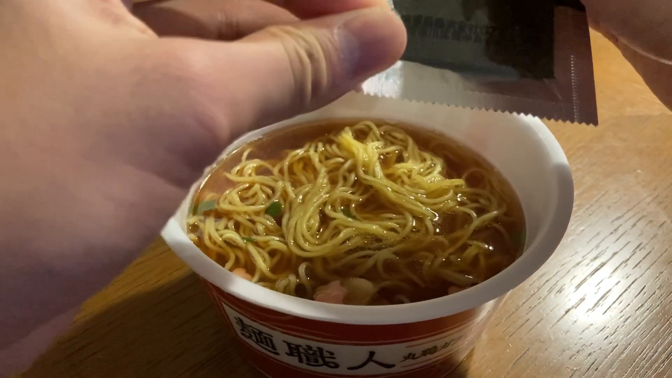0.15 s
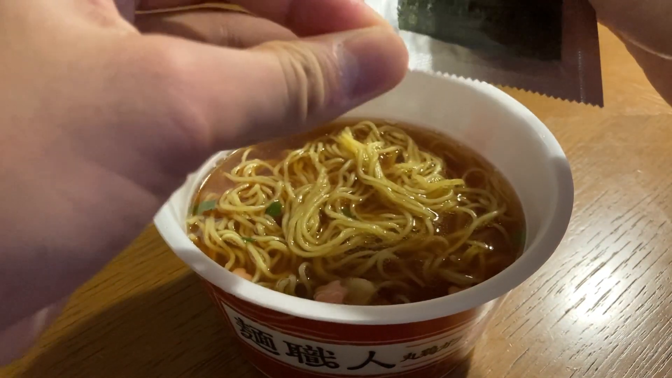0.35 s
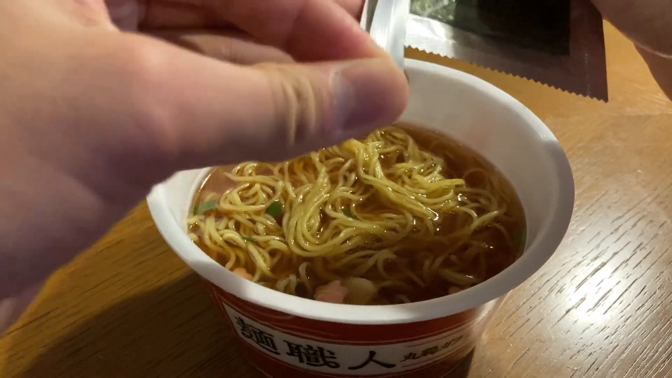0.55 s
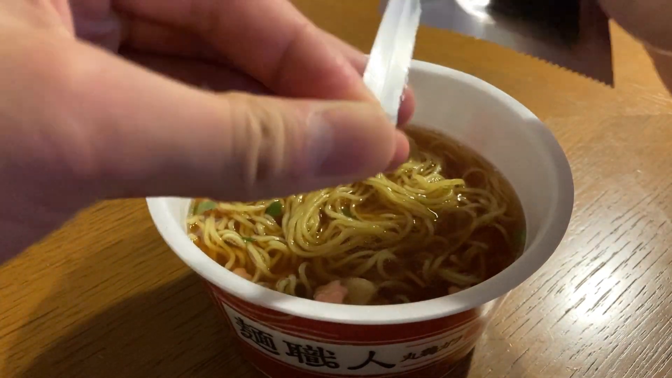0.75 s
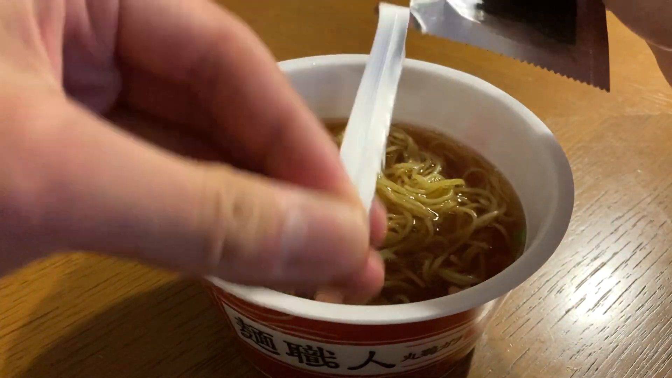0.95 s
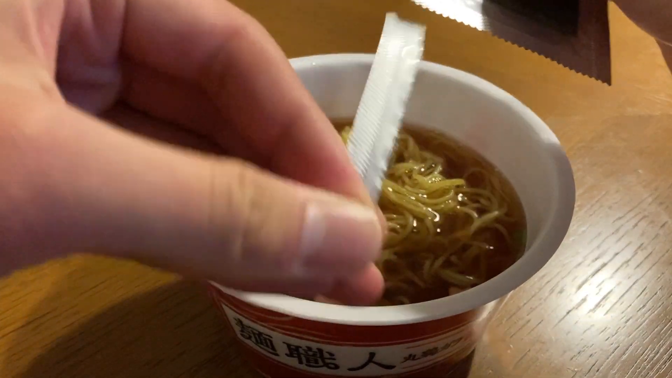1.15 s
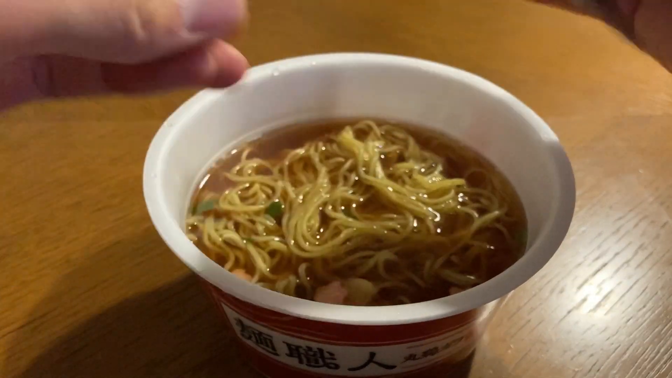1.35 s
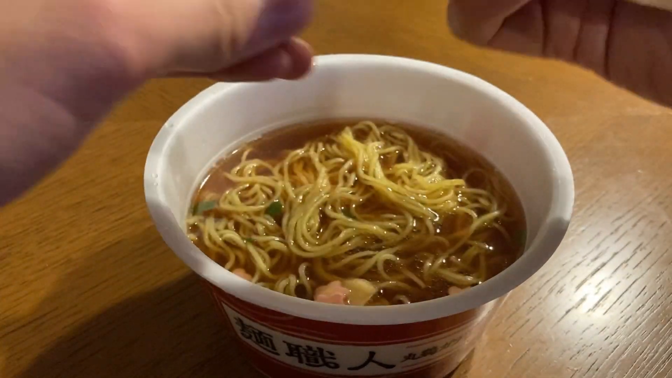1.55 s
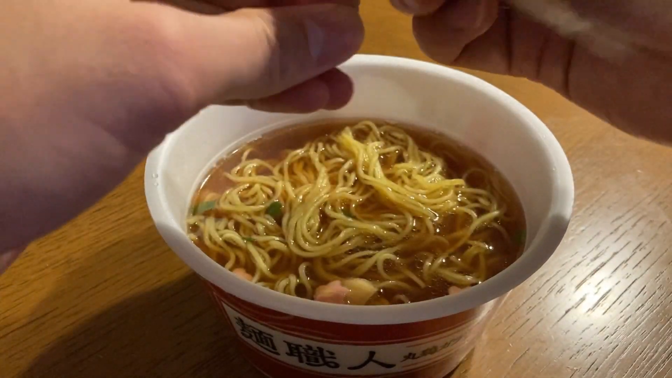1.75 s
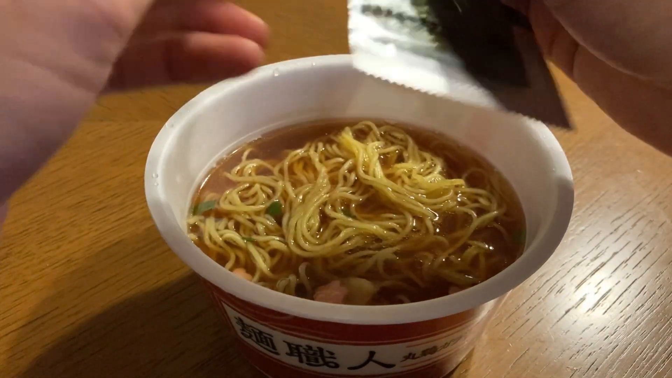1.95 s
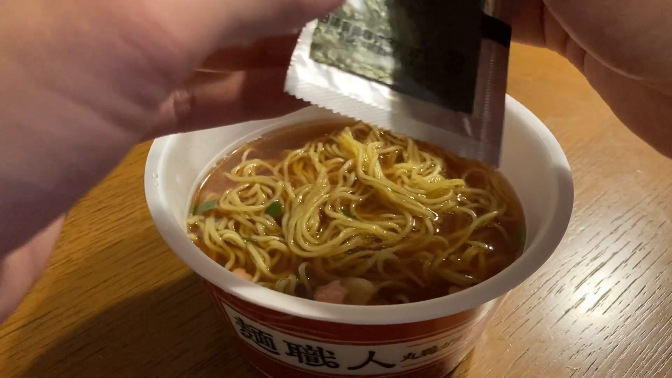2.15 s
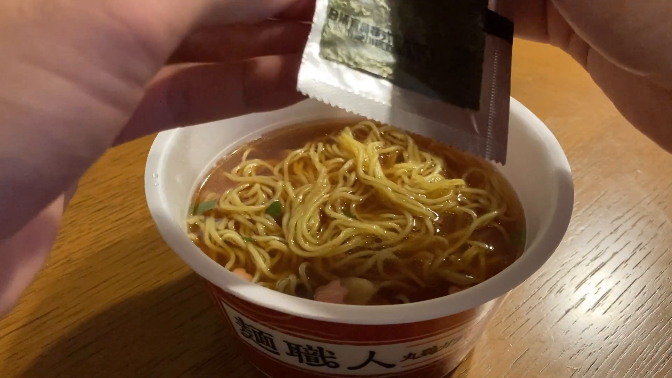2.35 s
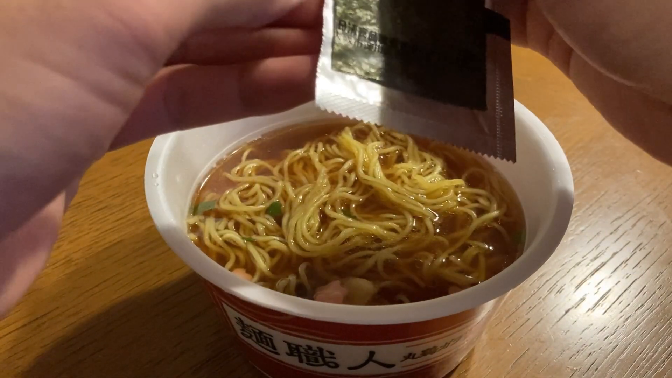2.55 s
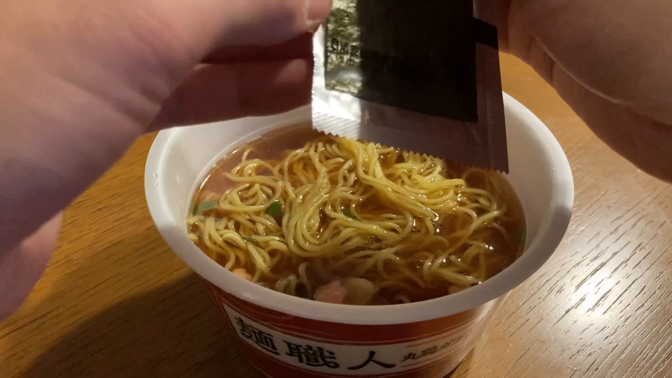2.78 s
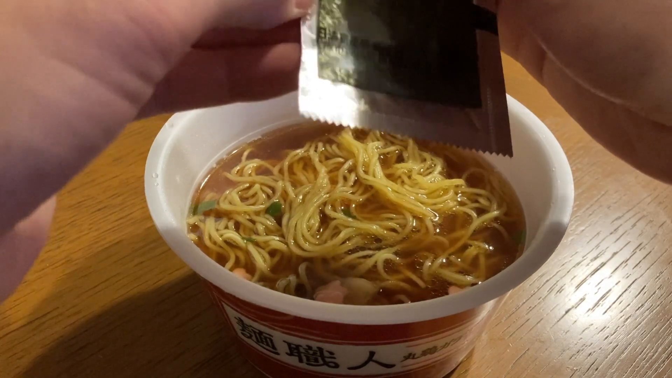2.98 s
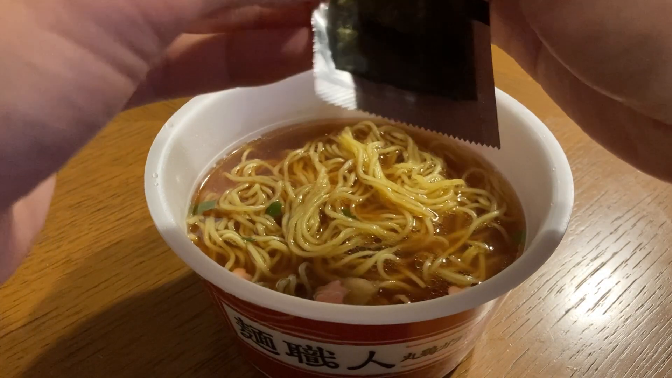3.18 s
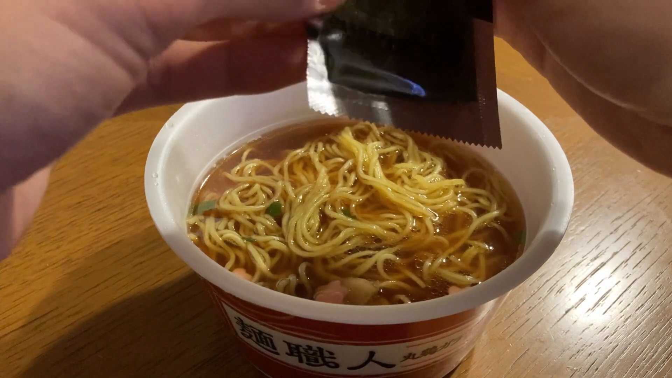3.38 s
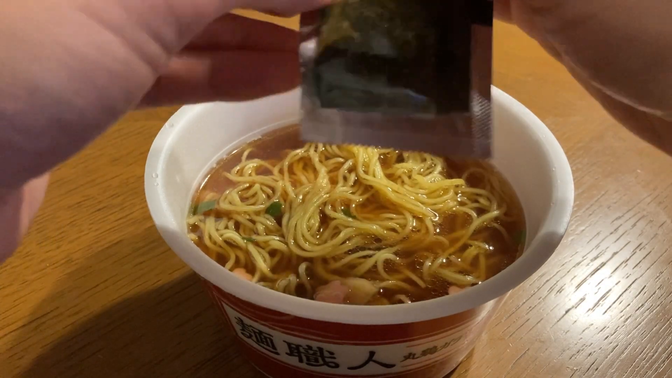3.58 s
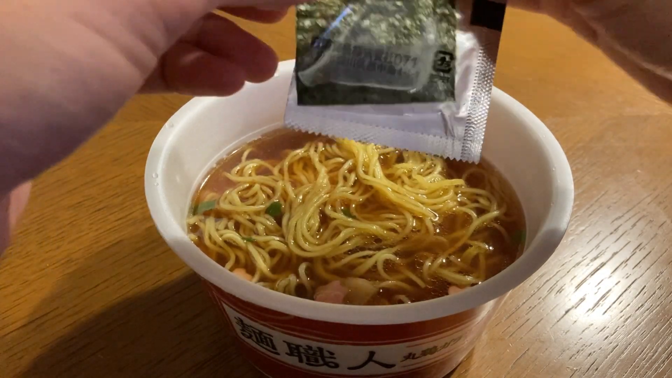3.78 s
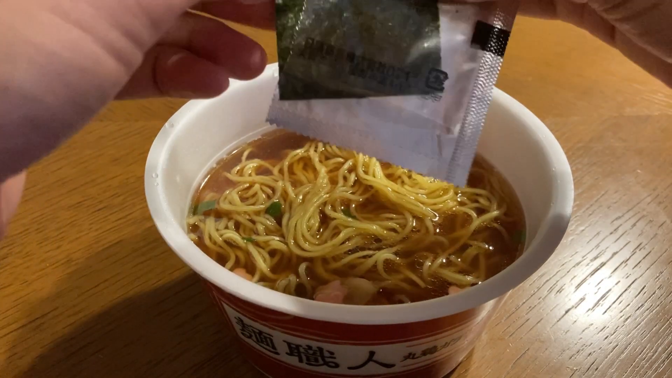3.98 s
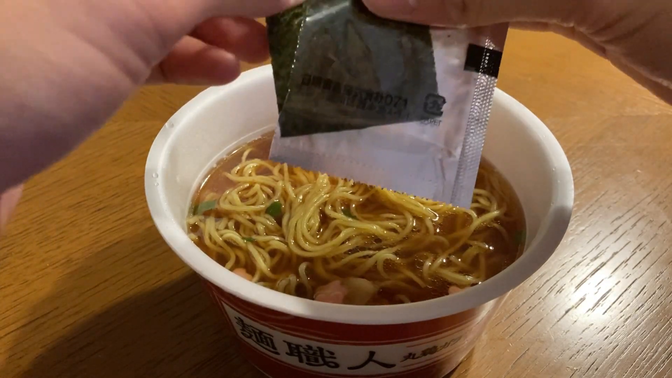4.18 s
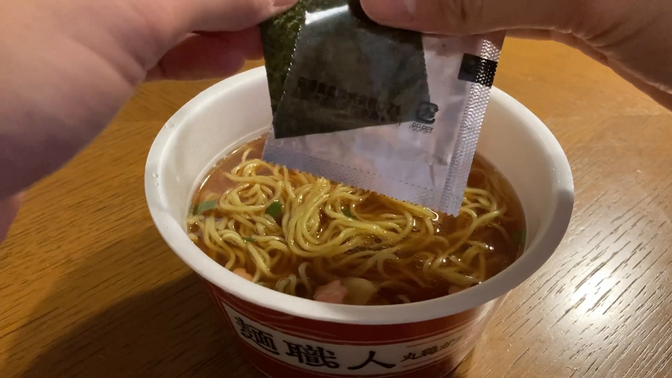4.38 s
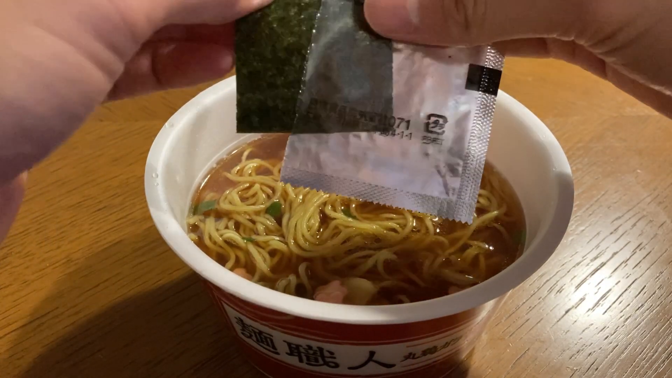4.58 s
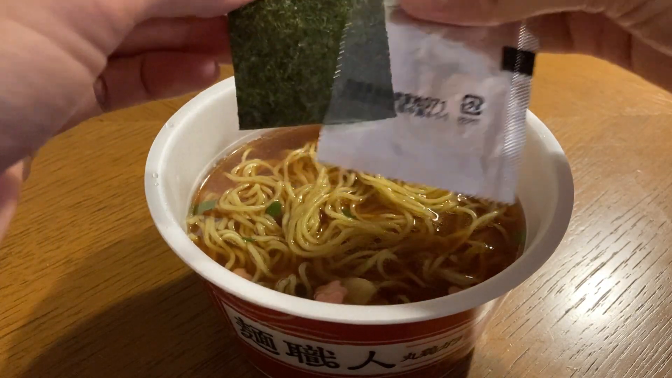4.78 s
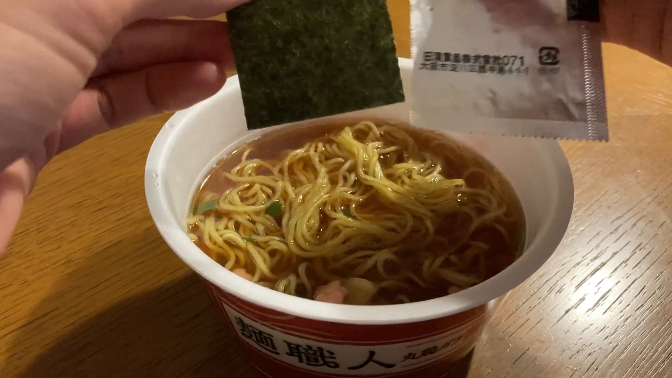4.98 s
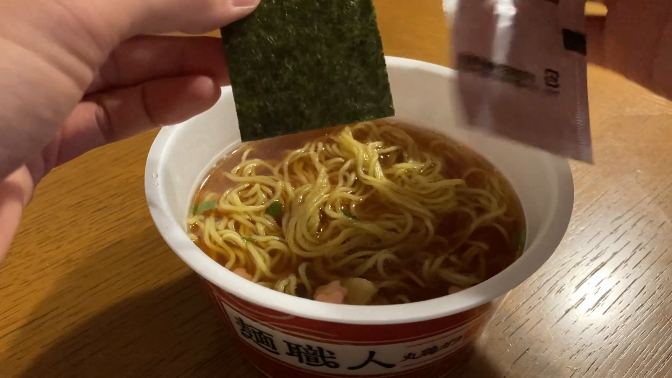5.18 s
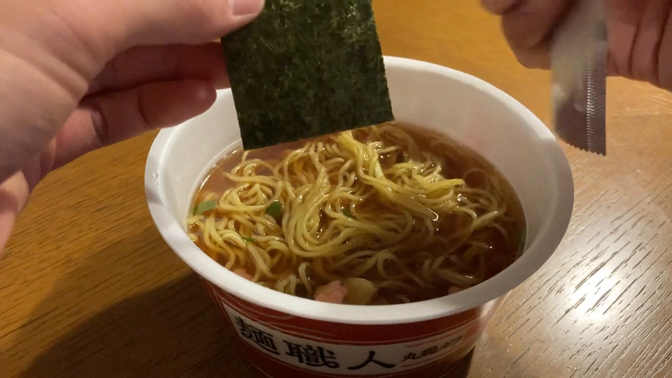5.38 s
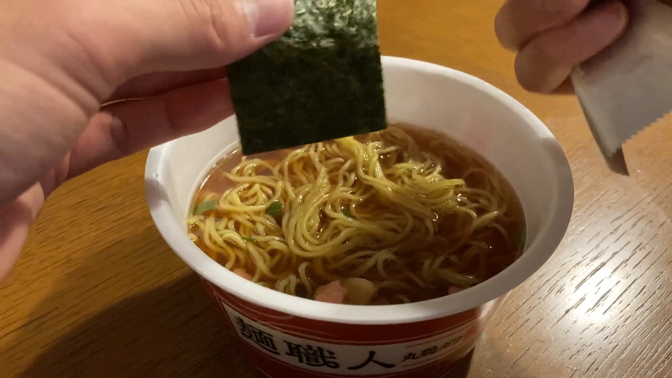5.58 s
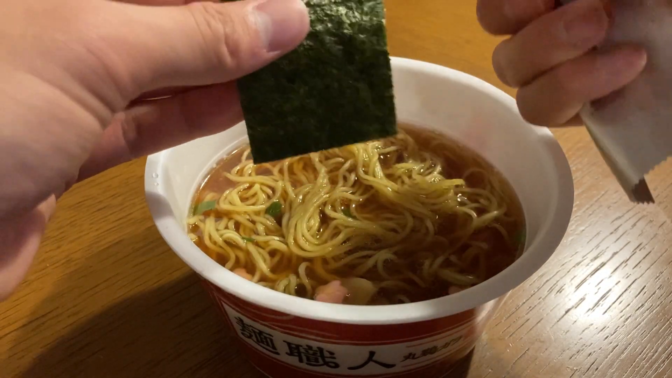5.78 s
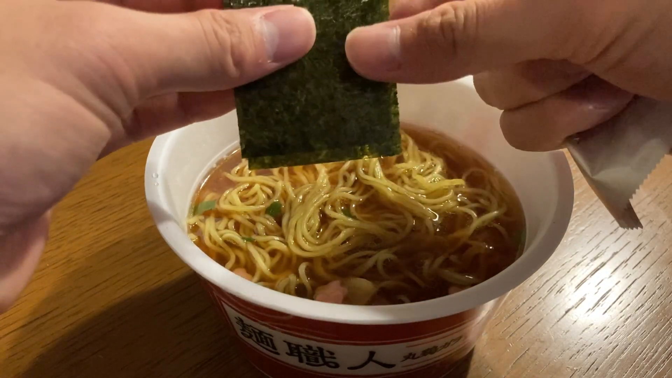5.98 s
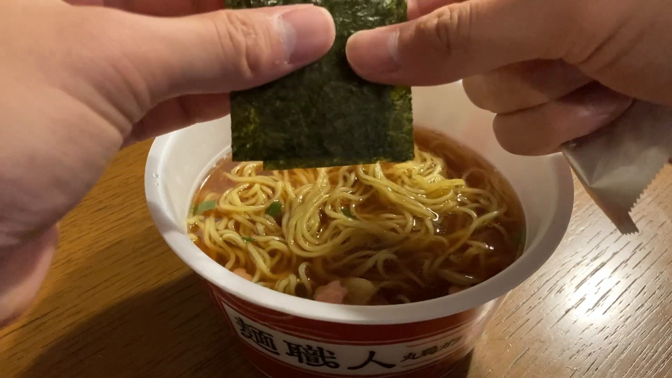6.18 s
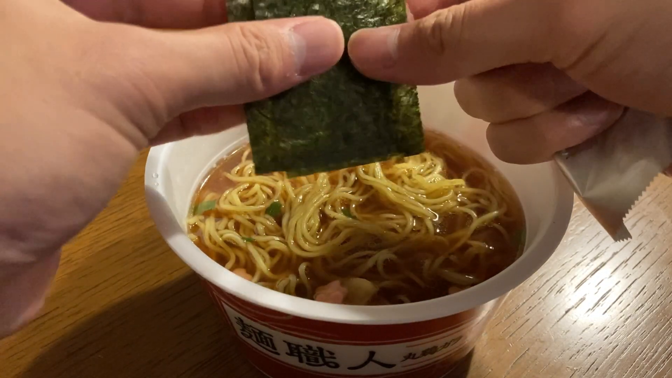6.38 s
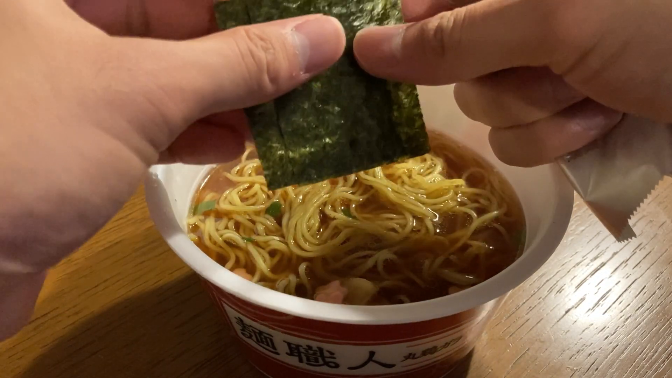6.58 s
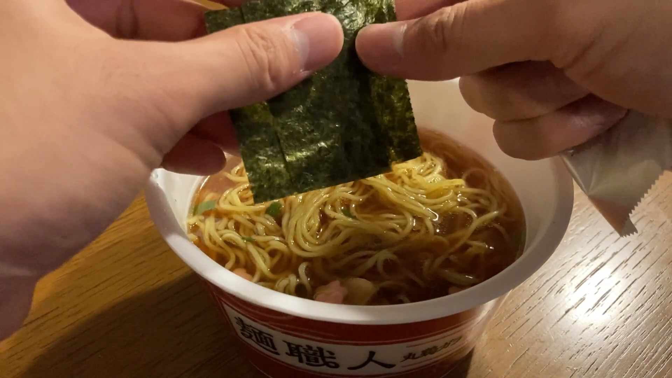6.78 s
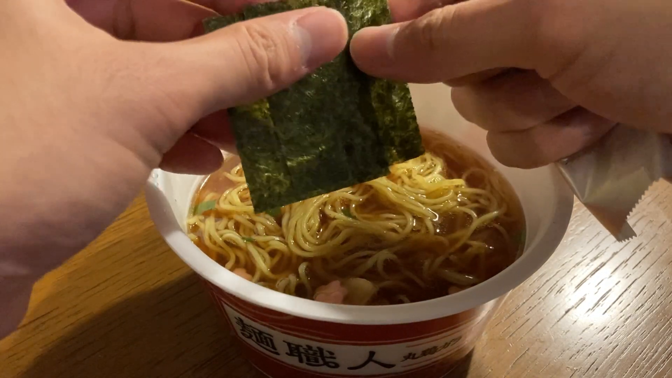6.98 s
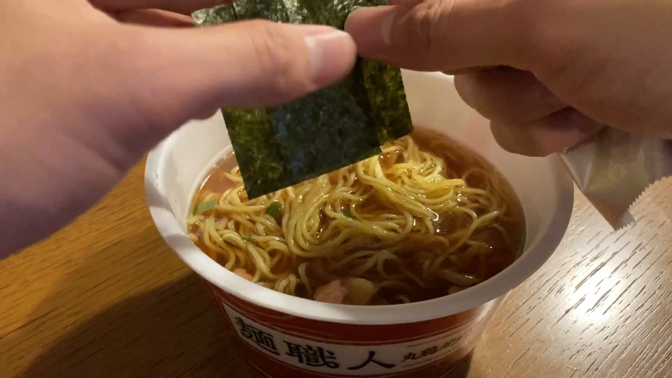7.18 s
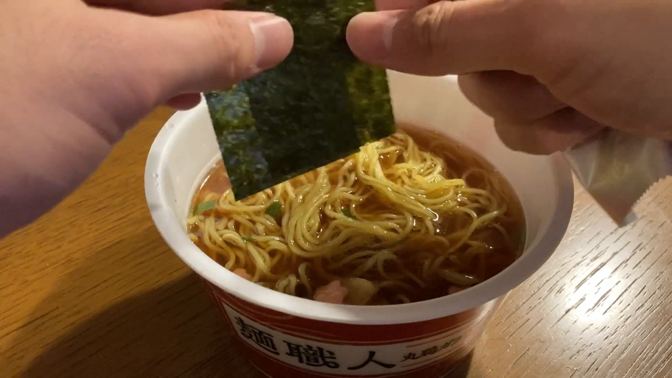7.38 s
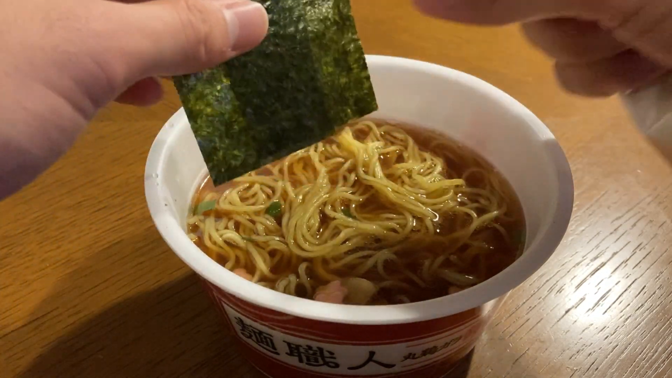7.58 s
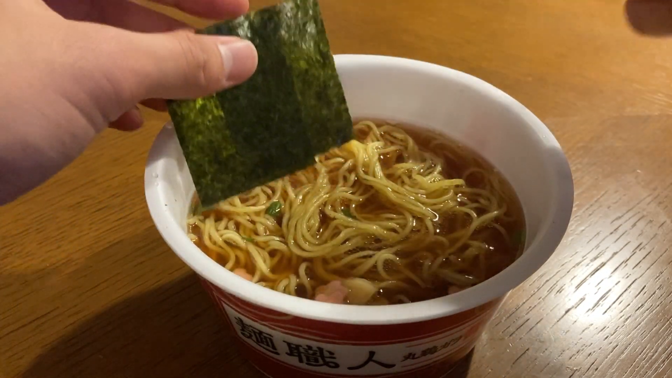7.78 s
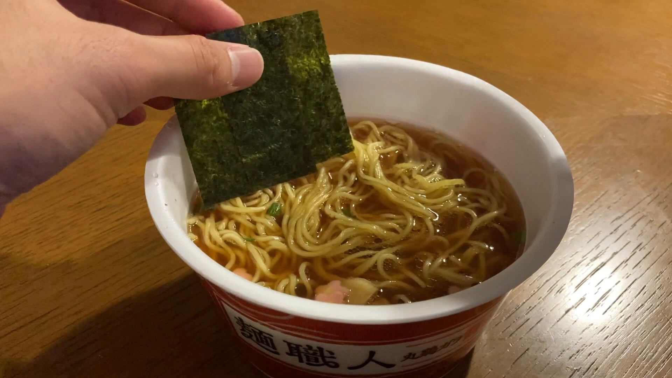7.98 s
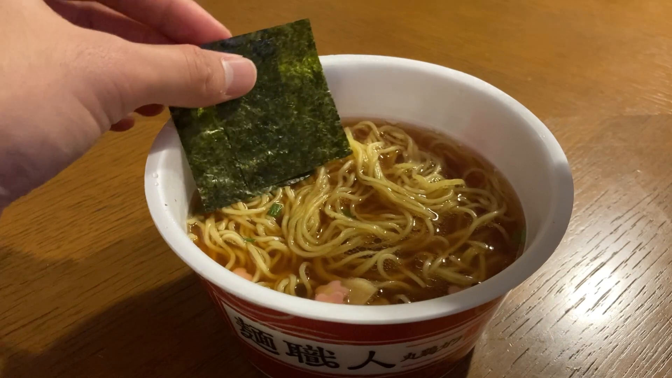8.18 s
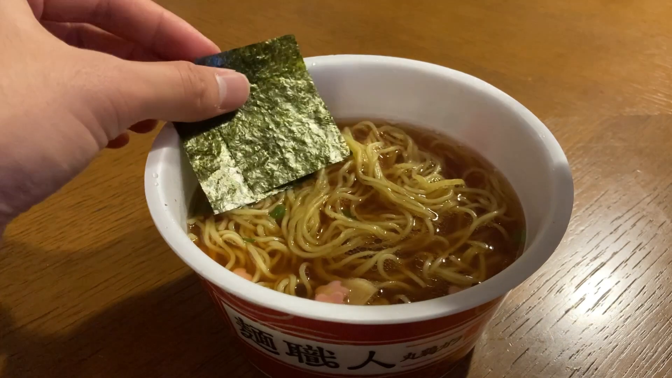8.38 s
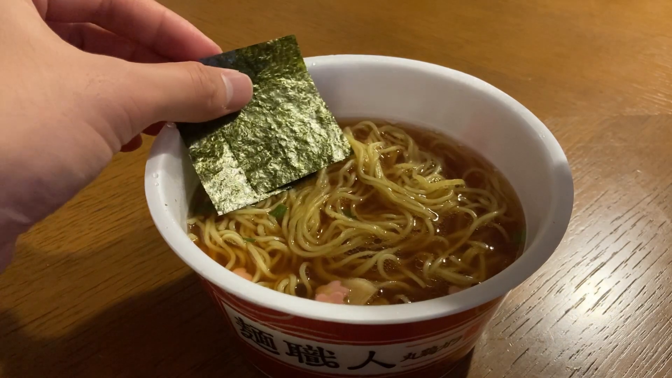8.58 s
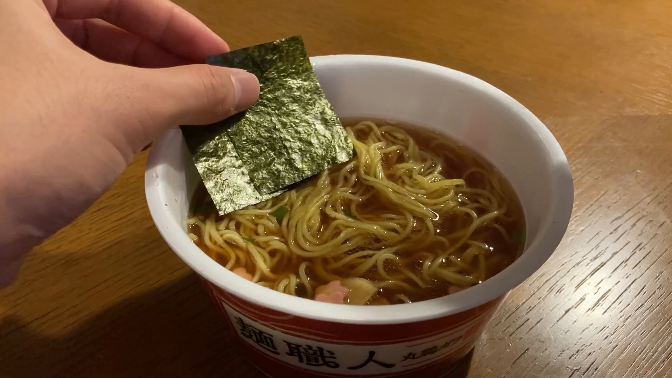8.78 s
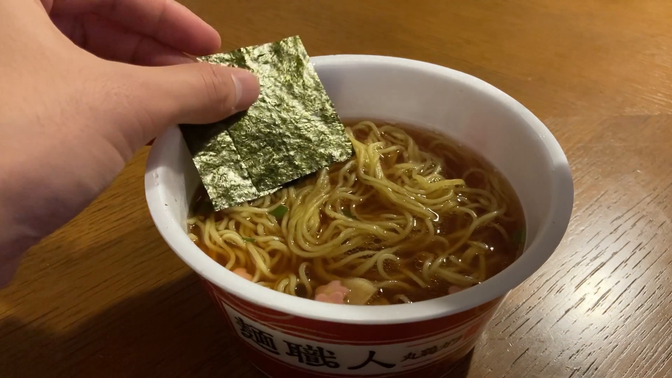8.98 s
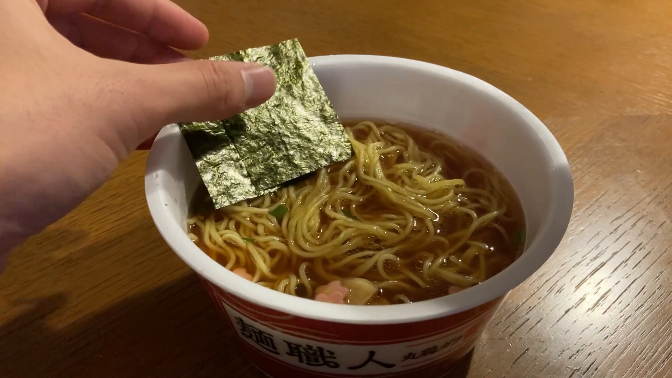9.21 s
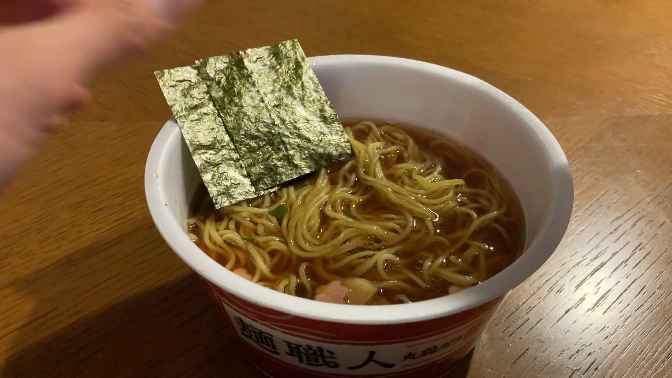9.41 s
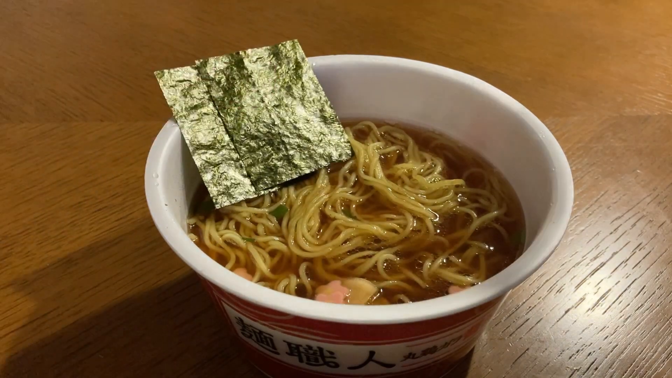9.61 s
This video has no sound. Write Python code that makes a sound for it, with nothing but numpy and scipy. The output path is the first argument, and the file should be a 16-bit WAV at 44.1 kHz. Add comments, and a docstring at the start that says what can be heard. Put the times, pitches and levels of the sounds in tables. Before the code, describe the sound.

Close up, a small foil packet crackles with sharp snaps, grows busiest midway, then gives way to dry seaweed rustles fading into quiet room air.

```python
"""A foil packet is handled close up: its creases buckle with sharp snaps, each a kicked, ringing panel.
Foil, dried seaweed and fingers rub in a fine crackle of random slips, while a hand works the seaweed sheet
out and sets it in a cup of noodles; its dry edge rasps by stick-slip at two resonances.
Fingertips tap, and the table takes a few soft bumps: short damped swings. Early on something hollow
knocks farther off, a sum of decaying modes. Behind lie shaped noise for air and an appliance's wavering hum."""
import sys
import numpy as np
from scipy import signal
from scipy.fft import rfft, irfft, next_fast_len
from scipy.io import wavfile
from scipy.ndimage import uniform_filter1d, map_coordinates

SR = 44100
rng = np.random.default_rng(int(sys.argv[2]) if len(sys.argv) > 2 else 0)


def file_out(sig):
    """Save sig as 16-bit WAV at sys.argv[1]."""
    # one column per channel
    cols = np.atleast_2d(sig).T
    # limit, then scale
    lim = np.clip(cols, -1, 1)
    pcm = np.round(lim * 32767).astype(np.int16)
    wavfile.write(sys.argv[1], SR, pcm)


N = 425565

# Louder creases snapping: t/s, crack level/dB, crack f/Hz, panel ring level/dB, panel f/Hz
SNAPS = [(0.0399, -45, 10300, -51, 4690), (0.0773, -38.5, 11000, -46.5, 4180),
         (0.1168, -43, 11500, -75.0, 4200), (0.1239, -41.5, 14000, -73, 3940),
         (0.2217, -49.0, 7300, -58.5, 4690), (0.3303, -54, 11400, -65.0, 1360),
         (0.3727, -46.5, 10200, -51, 4670), (0.3899, -33.5, 14000, -55.5, 3920),
         (0.46, -49, 14000, -67.0, 1610), (0.4656, -50.0, 8100, -57.5, 1680),
         (0.4698, -40.5, 12800, -68, 4110), (0.5741, -39.5, 11800, -71.0, 3400),
         (0.6212, -36.5, 10900, -48.5, 3680), (0.684, -40, 11700, -62, 2910),
         (0.6946, -35, 9300, -44, 1810), (0.7124, -42, 9500, -53, 1360), (0.7249, -31, 11900, -55, 3450),
         (0.7358, -52, 11800, -69, 1870), (0.7578, -45.5, 9600, -61, 3270),
         (0.7743, -56, 8200, -59.5, 3530), (0.8795, -59, 8400, -66, 4410), (0.917, -56, 9400, -83.5, 1360),
         (0.9293, -53, 8600, -64, 1830), (0.9425, -50.0, 6000, -55.0, 4330),
         (0.9906, -46.5, 7700, -63.5, 2450), (1.3539, -54.5, 6800, -70, 1640),
         (1.4081, -44, 9800, -50.5, 2670), (1.4866, -52, 6000, -55, 2500), (1.4912, -37.5, 6900, -62, 4200),
         (1.5272, -51, 6000, -50.5, 2410), (1.7136, -55.0, 8600, -80, 3830),
         (1.7375, -49.5, 6000, -54.5, 1890), (1.8265, -44.0, 10800, -67, 3620),
         (1.8322, -51, 7200, -53.5, 2130), (1.9027, -55.0, 8900, -52.5, 2500),
         (1.9186, -50.5, 6000, -61, 1920), (1.9832, -52.5, 6000, -65, 2710),
         (2.177, -63, 6600, -75.0, 2610), (2.1874, -62, 8500, -72, 2930), (2.3196, -45.5, 6000, -63, 1770),
         (2.4085, -51, 9700, -69, 2610), (2.4804, -59, 7400, -56.5, 1360), (2.5025, -49, 9900, -70, 1360),
         (2.5065, -57, 12500, -59, 2710), (2.5129, -50, 10100, -58.0, 1920),
         (2.6052, -63, 14000, -83, 1360), (2.6281, -40.5, 9300, -49, 1700),
         (2.6477, -47, 11400, -62.5, 1610), (2.6948, -51.5, 14000, -73.0, 1440),
         (2.7033, -48, 9400, -70.5, 1770), (2.7216, -29, 11500, -41.5, 1720),
         (2.7306, -42.5, 6700, -54, 3680), (2.7379, -36, 9200, -51, 1360),
         (2.7495, -42, 10400, -48.5, 4350), (2.8769, -61.0, 14000, -71.0, 1360),
         (2.9516, -44, 6000, -56, 3660), (2.9619, -32, 9100, -41, 4500), (2.9719, -33.0, 10000, -46, 3810),
         (2.9805, -43, 10800, -48, 1960), (3.0383, -45, 8900, -51, 1790),
         (3.0968, -56.0, 8600, -83.0, 1640), (3.1125, -48, 7200, -73, 4690),
         (3.1291, -49.5, 10100, -81.0, 1360), (3.1501, -56.5, 9600, -88.0, 1360),
         (3.1899, -49, 10600, -61.5, 1660), (3.296, -51.5, 6300, -70, 1770),
         (3.3433, -47.5, 6000, -77, 3120), (3.3566, -51.5, 7900, -75.0, 1680),
         (3.37, -52.5, 9600, -69.5, 1720), (3.431, -67, 6900, -35.5, 1850), (3.4445, -61, 6000, -58, 1680),
         (3.4741, -58, 7600, -58, 1770), (3.4781, -30.5, 8200, -36, 4570), (3.5204, -42, 8700, -47, 1700),
         (3.5244, -53, 7700, -40.5, 1490), (3.5369, -45, 9400, -42.0, 1680),
         (3.5745, -44.0, 6200, -50, 1790), (3.595, -54, 7400, -61.5, 4520),
         (3.6163, -36.5, 6200, -42, 1830), (3.6677, -47, 10900, -60.5, 1940),
         (3.702, -67, 6000, -56.5, 1720), (3.744, -35, 11500, -56, 1770), (3.8796, -37.5, 6000, -53, 2970),
         (3.9222, -43, 6000, -60.0, 2650), (3.9274, -45, 6000, -60, 2710), (3.937, -62, 6000, -73.0, 4650),
         (3.9563, -38.5, 9300, -48, 2730), (3.9901, -41.5, 6500, -50, 2890), (4.0145, -43, 8700, -52, 1740),
         (4.0486, -45, 9800, -62, 2730), (4.093, -52, 7000, -70, 1550), (4.2234, -59.5, 10900, -65, 2760),
         (4.2743, -59, 9100, -87.0, 1360), (4.3465, -31, 10600, -40, 4690), (4.3751, -50, 11100, -56, 3190),
         (4.4017, -35, 10100, -49.5, 1590), (4.4098, -42, 7300, -50, 3340), (4.4499, -51, 9900, -56, 4090),
         (4.49, -70, 7800, -52.5, 1680), (4.5455, -39.5, 10000, -43.5, 4690),
         (4.5682, -43.5, 9900, -48.5, 1590), (4.6379, -49.0, 6600, -49.5, 3230),
         (4.8259, -48.5, 6000, -50, 3700), (4.8603, -44, 6000, -44.5, 1610),
         (4.905, -39, 9900, -43.5, 4290), (4.9279, -50, 10600, -63, 3230), (4.9888, -62, 8500, -53.5, 3340),
         (5.0468, -47.0, 9300, -61, 3170), (5.0718, -51, 10700, -57.0, 3880),
         (5.0789, -50, 8000, -67, 4500), (5.1848, -65, 7500, -50, 3900),
         (5.2052, -39.5, 11100, -50.5, 2110), (5.2211, -45, 9200, -53, 1590), (5.257, -48, 6000, -51, 4410),
         (5.2611, -34, 10100, -56, 4520), (5.2804, -35, 6000, -35.5, 1640), (5.2968, -34, 6000, -33, 2450),
         (5.3103, -27, 12900, -53.5, 3960), (5.3251, -22, 12600, -47, 4570), (5.33, -48, 7000, -42.5, 1790),
         (5.346, -36.5, 10200, -38.5, 1890), (5.3529, -42, 8500, -44.5, 2130),
         (5.3631, -35.5, 6000, -47.5, 2220), (5.3838, -23.0, 12300, -39.5, 2670),
         (5.4329, -36.5, 6000, -40.5, 2110), (5.4459, -43.5, 9800, -47.5, 2280),
         (5.4537, -49.5, 11000, -59.0, 2110), (5.4759, -47.5, 6000, -56.5, 4310),
         (5.49, -27, 10500, -41.5, 4050), (5.5891, -30.5, 8500, -30.5, 3980),
         (5.5925, -41, 7500, -39, 3680), (5.6137, -29.5, 9500, -36, 2300), (5.6171, -32.5, 8500, -43, 4050),
         (5.6518, -51.5, 6000, -49.5, 4110), (5.6578, -38.0, 9700, -47.5, 3940),
         (5.8353, -38.0, 11000, -60, 1980), (5.8575, -33, 11200, -52, 2130),
         (5.8645, -44, 11000, -57.0, 3960), (5.8803, -36, 10600, -43.5, 3730),
         (5.9788, -49.5, 8200, -72.5, 4650), (5.991, -52, 9900, -63, 4690),
         (5.9953, -39.5, 8600, -46, 3810), (6.0085, -49, 14000, -78.5, 2670),
         (6.0378, -44.0, 10700, -57.5, 2730), (6.0427, -40.0, 14000, -70.5, 1570),
         (6.0494, -46, 12000, -73.5, 2110), (6.0631, -53, 14000, -80.5, 2450),
         (6.07, -46.5, 13600, -82.0, 2540), (6.0904, -40.5, 6000, -42.5, 2630),
         (6.0999, -39, 13000, -64, 1640), (6.1076, -39, 11300, -75.5, 2860),
         (6.1553, -37.5, 11000, -68.5, 3250), (6.1742, -34, 12500, -72.5, 4690),
         (6.1806, -45, 11000, -59, 3470), (6.2021, -49, 12400, -59, 3380), (6.2298, -51, 10500, -62, 3420),
         (6.2464, -46, 11000, -64, 1550), (6.2514, -43, 11400, -73.0, 3100),
         (6.2552, -49, 11900, -73, 3290), (6.4007, -34.5, 14000, -51, 1460),
         (6.4635, -47, 14000, -75, 1530), (6.583, -53, 8800, -59, 4010), (6.6264, -49.5, 10500, -64, 1510),
         (6.6741, -48.5, 7300, -68, 3830), (6.7963, -40, 13300, -62.5, 3960),
         (7.2953, -56, 7300, -61, 2150), (7.3124, -49, 6000, -47, 2090), (7.3383, -36, 6000, -42.5, 2130),
         (7.3481, -49, 6000, -51, 1960), (7.3545, -41.5, 6000, -62, 2430), (7.365, -43, 11300, -55, 3830),
         (7.4011, -44, 11100, -71, 2670), (7.4075, -46, 10200, -67, 1530), (7.4474, -55, 9900, -64, 1610),
         (7.5406, -44.5, 9800, -63, 1360), (7.5584, -49, 12200, -66, 1360),
         (7.5684, -58, 11500, -76.0, 4540), (7.6426, -47, 12000, -70.0, 3100),
         (7.6468, -42, 10700, -55, 3250), (7.6695, -38, 11300, -53, 2050), (7.8329, -56, 12000, -68, 1360),
         (8.3184, -54.5, 8800, -73, 2240), (8.3874, -33, 13500, -55.0, 2300),
         (8.9933, -59.5, 8500, -87, 1360), (9.3591, -57, 6000, -62.5, 2580),
         (9.3788, -54, 7100, -78.5, 2710), (9.3827, -43.5, 12000, -55, 2580),
         (9.3991, -42.5, 9400, -59, 4330)]
# Small creases snap at random; their levels are relative to the rubbing, up to a ceiling
SMALL_SNAPS_PER_S, SMALL_CRACK_DB, SMALL_RING_DB, SMALL_SPREAD_DB = 24, 1.5, -1, 1.5
SMALL_CRACK_HZ, SMALL_PANEL_HZ, SMALL_LOUDEST_DB = 8600, (1560, 3150), -44
PORTS_APART_DB = -4  # each port's own flutter noise against the noise that they share

# Strokes of the fingers: start t/s, length t/s, fine crackle level/dB, flexing sheet level/dB
STROKES = [(0.035, 0.075, -64, -67.5), (0.211, 0.21, -61.5, -63.5), (0.457, 0.029, -54, -63),
           (0.523, 0.24, -58, -68), (0.688, 0.045, -59, -53.5), (0.935, 0.055, -56.5, -59),
           (1.363, 0.073, -56, -65.5), (1.491, 0.0092, -54, -57), (1.689, 0.086, -67, -69),
           (1.821, 0.005, -49, -58), (1.901, 0.01, -60, -60), (1.972, 0.015, -59, -66),
           (2.185, 0.0049, -62.5, -70.5), (2.506, 0.0052, -66, -59.5), (2.624, 0.087, -59, -62.5),
           (2.716, 0.073, -55, -57.5), (2.99, .05, -52, -59), (3.01, 0.021, -44.5, -51.5),
           (3.09, 0.055, -63, -68), (3.285, 0.06, -56, -58.5), (3.394, 0.24, -54, -58),
           (3.665, 0.25, -53.5, -61.5), (3.9, 0.17, -52.5, -58), (4.278, 0.2, -55, -64),
           (4.406, 0.055, -50, -56.5), (4.536, 0.13, -53, -59.5), (4.682, 0.17, -58.5, -62),
           (4.825, 0.14, -49, -56), (5.02, 0.076, -56, -68), (5.132, 0.0067, -53, -54.5),
           (5.207, 0.0049, -48, -55), (5.267, 0.1, -50, -51.5), (5.373, 0.13, -53, -57.5),
           (5.545, 0.16, -51.5, -59.5), (5.684, 0.13, -59, -65), (5.797, 0.13, -45, -57),
           (5.897, 0.15, -56, -73), (6.03, 0.11, -46.5, -63.5), (6.128, 0.041, -41.5, -54.5),
           (6.244, 0.069, -51, -60.5), (6.404, 0.02, -42.5, -52.5), (6.44, 0.23, -55, -60),
           (6.675, 0.095, -44, -51.5), (6.785, 0.076, -55, -60), (6.87, 0.09, -60, -65),
           (6.98, .035, -63, -70), (7.062, 0.075, -57, -60), (7.224, 0.075, -52, -63),
           (7.342, 0.008, -41, -52), (7.406, 0.019, -41.5, -56.5), (7.555, 0.013, -46, -59),
           (7.644, 0.06, -55, -64), (7.786, 0.17, -65, -85), (8.047, 0.031, -60.5, -68),
           (8.372, 0.031, -67, -70), (8.535, 0.053, -79, -61.5), (8.814, 0.054, -61, -67.5),
           (8.9, 0.068, -70.5, -72), (9.377, 0.045, -54, -60.5), (9.454, 0.019, -53, -60.5)]
STROKE_ATTACK_DB_PER_S, STROKE_SAG_DB = 905.5, 0.5
STROKE_RELEASE_DB_PER_S, SHEET_RELEASE_DB_PER_S = 580, 358
# Light contact between strokes, while packet or seaweed is held: t/s, level/dB
GRIP = [(0, -77), (.8, -76), (1.15, -87), (1.7, -77.5), (2.4, -84), (3.0, -67), (3.7, -63), (4.18, -74),
        (4.6, -65.5), (5.6, -64.5), (6.85, -70), (7.03, -86), (7.5, -94), (8.1, -73), (9.2, -87),
        (9.6, -72.5)]
# Spectra of rubbing foil, the fine crackle and the bending sheet: f/Hz, level/dB (per Hz, relative)
FOIL_CRACKLE = [(2500, -8.5), (4000, -6.5), (5400, -1), (6500, 1.5), (8400, 6), (10500, 8), (12500, 4),
                (15500, 1.5)]
FOIL_FLEX = [(350, 8), (700, 1.5), (1200, 0), (1700, 7.5), (2400, -6), (3000, -5), (3800, 7), (5000, 3.5),
             (7500, -15)]
# The same for the bare dry seaweed: f/Hz, level/dB (per Hz, relative)
SEAWEED_CRACKLE = [(2500, -14), (3800, -18), (5500, -8), (7300, 5.5), (8400, 10.5), (11500, 10.5),
                   (14000, 7.5), (15600, 8.5)]
SEAWEED_FLEX = [(700, -8.5), (1400, -0.5), (2100, 3), (2500, -18.5), (2950, -1), (3700, 8.5), (4800, -0.5),
                (7500, -8.5)]
SEAWEED_RUBBED_S = 5.75  # the fingers rub the bare seaweed from here on
TICKS_DB = -5  # tiny creases against the slips

# The seaweed scrapes along the foil, the fingers and at last the cup:
# start t/s, length t/s, level/dB, main resonance f/Hz, second resonance f/Hz
SCRAPES = [(4.827, 0.073, -59, 1490, 4040), (5.134, 0.014, -56.5, 1550, 2640),
           (5.27, 0.077, -48, 1640, 2420), (7.236, 0.098, -68, 1970, 3650), (7.34, 0.11, -66, 1980, 3770),
           (8.04, 0.094, -74, 2350, 2720), (8.523, 0.078, -63, 2440, 2660), (8.826, 0.042, -69, 2480, 2610),
           (9.366, 0.05, -59, 3500, 1940), (9.45, 0.016, -73, 2960, 4000), (9.56, .07, -76, 4900, 3480)]
# Fingertips tap the limp packet: t/s, level/dB, f/Hz
TAPS = [(3.026, -48.5, 950), (3.508, -60, 834), (5.137, -57, 608), (5.327, -43.5, 860), (5.432, -39, 720),
        (6.090, -48, 685), (6.606, -53, 790), (6.623, -56, 940)]
# Where the hands work, as the lag of the left port behind the right: t/s, lag/ms
HAND_LAG = [(0, -0.085), (1.4, -0.067), (2.5, -0.11), (4.75, -0.1), (5.1, -0.048), (5.5, -0.031),
            (6.08, -0.06), (6.11, -.14), (7.0, -0.13), (7.65, -0.17), (8.4, -0.096), (8.95, -0.12),
            (9.35, 0.07)]
LEFT_DB = 3.5
ROOM_T60_S, ROOM_DB = 0.2, -20

# Soft bumps on the table: t/s, level/dB, f/Hz
BUMPS = [(2.003, -43, 60), (2.132, -46, 52.4), (5.305, -46, 75)]
# The knock farther off, a light touch and then the blow: t/s, level/dB
KNOCK = [(0.231, -40), (0.2377, -22)]
# Modes of the knocked body: f/Hz, width f/Hz, level/dB (relative)
KNOCK_MODES = [(239, 9.3, 6), (445.6, 14, 11.5), (497, 11, 5), (825, 11, 1), (1087, 14, -8), (1240, 12, -4),
               (1350, 22, -11), (1450, 15, 4), (1770, 11, -6), (2410, 8.1, -13), (2790, 11, -2),
               (3700, 18, -22)]
# Broad spectrum of the knock: f/Hz, level/dB (per Hz, relative)
KNOCK_COLOUR = [(47, -47), (80, -3.5), (150, -23), (233, -0.5), (306, -38), (446, -2.5), (611, -33),
                (970, 5), (1100, -0.5), (2150, -20), (4390, -15.5), (12000, -52), (15600, -80),
                (22000, -120)]
# Decay of the knock's tail: f/Hz, time to fall by 60 dB t/s
KNOCK_T60 = [(120, 0.69), (260, 0.38), (700, 0.19), (1840, 0.3), (5000, 0.14)]
# Spectrum of the room air: f/Hz, level/dB (per Hz, relative)
AIR = [(18, -20.5), (32, -7), (70, -5.5), (130, -4), (210, -2), (360, -5), (450, -14), (650, -18.5),
       (1150, -19), (1600, -29.5), (2700, -30.5), (3400, -37), (6500, -46), (15000, -49.5)]
AIR_DB = -57
# Lines of the appliance hum: f/Hz, level/dB (rms, before its slow drift)
HUM = [(101, -68.5), (135, -78.5), (168, -72), (220, -67.5), (307, -74), (350, -68.5), (490, -77),
       (735, -83.5), (1103, -76.5), (1378, -89), (2470, -100.5)]
# Likeness of diffuse sound at the two ports: f/Hz, correlation/1
LIKENESS = [(60, 0.68), (300, 0.68), (700, 0.084), (1400, 0.15), (3000, 0), (15000, 1)]

# The treble is shared by both channels and, higher up, widened by a delay
SHARED_FROM_HZ, WIDEN_FROM_HZ, WIDEN_LAG_S = (5900, 6400), 6900, .00022
ROLL_OFF_HZ, CUTOFF_HZ = 15750, 16700


def snaps(rows, crack_s=0.0002, flutter_s=0.0056, flutter_db=-18, crack_width_hz=5500, panel_width_hz=430,
          overtone_db=-5, panel_broad_db=-17, panel_flutter_db=-27, bounce_s=0.0023, bounce_db=-13):
    """Snap-through buckling: a crease flips, the film flutters on, and the kick excites the panel's modes."""
    out = np.zeros((2, N))
    t = np.arange(1024) / SR
    onset = t / crack_s * np.exp(1 - t / crack_s)
    flutter = np.exp(-t / flutter_s)
    kick = signal.unit_impulse(len(t), int(onset.argmax()))
    for s, crack_db, crack_hz, ring_db, ring_hz in rows:
        # the fluttering film is wide, so each port hears it a little differently
        force = rng.standard_normal((2, 1, len(t)))
        spread = force + from_db(PORTS_APART_DB) * rng.standard_normal((2, 2, len(t)))
        flip = onset * force[0] + from_db(flutter_db) * flutter * spread[0]
        push = kick + from_db(panel_flutter_db) * flutter * spread[1]
        crack = band(resonate(flip, crack_hz, crack_width_hz), 4900, SR / 2, order=1)
        # every panel has a shape of its own, hence its own neighbouring modes
        other_hz = ring_hz * rng.uniform([.55, 1.2], [.85, 1.7])
        others = sum(resonate(push, hz, panel_width_hz) for hz in other_hz)
        panel = resonate(push, ring_hz, panel_width_hz) - from_db(overtone_db) * others
        panel = band(panel + from_db(panel_broad_db) * push, 840, 6000, order=3)
        sound = from_db(crack_db) * burst(crack) + from_db(ring_db) * burst(panel)
        add(out, s, sound)
        # the table throws back a duller copy after a varying delay
        bounce = from_db(bounce_db) * band(sound, 300, 11000, order=1)
        add(out, s + bounce_s * rng.uniform(0.6, 1.25), bounce)
    return out


def small_snaps(fine_db, sheet_db, count=150):
    """Poisson process: rows like SNAPS for lesser creases in the foil, with levels that follow the rubbing."""
    chance, size = rng.random((count, 2)), rng.standard_normal((count, 2))
    s = np.cumsum(-np.log(1 - chance[:, 0])) / SMALL_SNAPS_PER_S
    at = np.minimum(s * SR, N - 1).astype(int)
    crack_db = fine_db[at] + SMALL_CRACK_DB + SMALL_SPREAD_DB * size[:, 0]
    ring_db = sheet_db[at] + SMALL_RING_DB + SMALL_SPREAD_DB * size[:, 1]
    crack_db, ring_db = np.minimum([crack_db, ring_db], SMALL_LOUDEST_DB)
    low_hz, high_hz = SMALL_PANEL_HZ
    panel_hz = low_hz * (high_hz / low_hz) ** chance[:, 1]
    rows = np.transpose([s, crack_db, np.full(count, SMALL_CRACK_HZ), ring_db, panel_hz])
    return rows[s < SEAWEED_RUBBED_S]


def rubbing(fine_db, sheet_db, crackle_db=-1, flex_db=1, seaweed_crackle_db=-1):
    """Sliding friction: slips crackle finely and the bent sheet answers lower; first foil, then dry seaweed."""
    in_foil = np.arange(N) / SR < SEAWEED_RUBBED_S
    creases = from_db(TICKS_DB) * ticks()
    foil_slips = slips(per_s=2200, spread_db=3.0, clump_db=3.5, smooth_db=2)
    foil_fine = from_db(crackle_db) * colour(foil_slips + creases, FOIL_CRACKLE)
    foil_bends = slips(per_s=900, spread_db=2.0, clump_db=4.5, smooth_db=-1.0)
    foil = from_db(flex_db) * colour(foil_bends + creases, FOIL_FLEX)
    flakes = slips(per_s=900, spread_db=3.0, clump_db=3.5, smooth_db=-1)
    seaweed_fine = from_db(seaweed_crackle_db) * colour(flakes, SEAWEED_CRACKLE)
    seaweed_bends = slips(per_s=800, spread_db=2.0, clump_db=3.5, smooth_db=-4)
    seaweed = colour(seaweed_bends, SEAWEED_FLEX)
    fine = np.where(in_foil, foil_fine, seaweed_fine) * from_db(fine_db)
    sheet = np.where(in_foil, foil, seaweed) * from_db(sheet_db)
    return fine + sheet


def strokes():
    """Dominance of the stronger contact: levels in dB of crackle and sheet, strokes standing over the grip."""
    t = np.arange(0, N, 32) / SR
    fine = sheet = np.interp(t, *np.transpose(GRIP))
    for start, length, fine_db, sheet_db in STROKES:
        fine = np.maximum(fine, fine_db + stroke_shape(t, start, length, STROKE_RELEASE_DB_PER_S))
        sheet = np.maximum(sheet, sheet_db + stroke_shape(t, start, length, SHEET_RELEASE_DB_PER_S))
    return [np.interp(np.arange(N) / SR, t, level_db) for level_db in (fine, sheet)]


def stroke_shape(t, start, length, release_db_per_s):
    """Exponential growth and decay, linear in dB: a quick rise, a sagging hold and a release."""
    early, late = np.maximum(start - t, 0), np.maximum(t - start - length, 0)
    sag = STROKE_SAG_DB * (.5 - np.clip((t - start) / length, 0, 1))
    return np.maximum(sag - STROKE_ATTACK_DB_PER_S * early - release_db_per_s * late, -120)


def slips(per_s, spread_db, clump_db, smooth_db):
    """Friction as shot noise: tiny uneven slips and a smooth hiss, clumped together; level evened."""
    sizes = from_db(spread_db * np.minimum(rng.exponential(1, N), 4)) * rng.choice([-1, 1], N)
    clicks = rms_one(sizes * (rng.random(N) < per_s / SR))
    hiss = from_db(smooth_db) * rng.standard_normal(N)
    grains = (clicks + hiss) * from_db(clump_db * drift(220))
    return grains / np.sqrt(uniform_filter1d(grains ** 2, size=1500) + 1e-9)


def ticks(per_s=60, spread_db=14.0, ring_s=0.00048):
    """Sudden release of strain: now and then a tiny crease lets go with a brief spray of clicks; rms 1."""
    sizes = from_db(spread_db * np.minimum(rng.exponential(1, N), 2)) * (rng.random(N) < per_s / SR)
    dying = signal.lfilter([1], [1, -np.exp(-1 / (ring_s * SR))], sizes + 1e-18)
    return rms_one(dying * rng.standard_normal(N))


def scrapes(width_hz=360, second_db=-2):
    """Stick-slip: the dry edge catches and slips, rasping at two resonances that change with the hold."""
    t = np.arange(N) / SR
    friction = slips(per_s=540, spread_db=3.0, clump_db=3.5, smooth_db=-7)
    out = 0
    for start, length, level_db, hz, second_hz in SCRAPES:
        second = from_db(second_db) * resonate(friction, second_hz, width_hz)
        rasp = resonate(friction, hz, width_hz) - second
        shape_db = stroke_shape(t, start, length, STROKE_RELEASE_DB_PER_S)
        out = out + rms_one(rasp) * from_db(level_db + shape_db)
    return out


def taps(contact_s=0.0043, width_hz=450):
    """Forced resonance: a soft touch, a short noise force, gives a hollow tick."""
    out, t = np.zeros((2, N)), np.arange(1024) / SR
    for s, level_db, hz in TAPS:
        touch = rng.standard_normal(len(t)) * np.exp(-t / contact_s)
        tick = band(resonate(touch, hz, width_hz), 300, 1600)
        add(out, s, from_db(level_db) * burst(tick))
    return out


def in_hand(x):
    """Level and arrival-time difference: louder at the left port, with a lag that follows the moving hands."""
    n = np.arange(N)
    lag = np.interp(n / SR, *np.transpose(HAND_LAG)) * SR / 1000  # in samples
    left = map_coordinates(x[0], [n - lag], order=3)
    return np.array([from_db(LEFT_DB) * left, x[1]])


def room(x):
    """Reverberation: the faint, short, exponentially decaying tail of a furnished room."""
    t = np.arange(SR // 3) / SR
    tail = band(rng.standard_normal((2, len(t))), 280, 5100, order=1)
    tail = tail * from_db(-60 * t / ROOM_T60_S) * (t > .004)
    tail = from_db(ROOM_DB) * rms_one(tail) / np.sqrt(len(t))
    return x + signal.oaconvolve(x, tail, axes=1)[:, :N]


def bumps(rise_s=0.007):
    """Strongly damped oscillation: the table top swings for a cycle or two under a hand."""
    out, t = np.zeros((2, N)), np.arange(SR // 4) / SR
    swell = t / rise_s * np.exp(1 - t / rise_s)
    for s, level_db, hz in BUMPS:
        add(out, s, -from_db(level_db) * np.sin(2 * np.pi * hz * t) * swell)
    return out


def knock(modes_db=-3, first_db=-4, first_s=0.0027, lag_ms=-0.48, tail_db=-3.5):
    """Modal decay: a dull blow rings a hollow body, and a diffuse tail dies away band by band."""
    out, t = np.zeros((2, N)), np.arange(SR // 2) / SR
    edges = np.geomspace(90, 12000, 15)
    for s, level_db in KNOCK:
        tail = first = body = 0
        for low, high in zip(edges, edges[1:]):
            hz = np.sqrt(low * high)
            gain = from_db(at_hz(KNOCK_COLOUR, hz))
            dying = diffuse(len(t)) * from_db(-60 * t / at_hz(KNOCK_T60, hz))
            tail = tail + gain * band(dying, low, high)
            contact = rng.standard_normal(len(t)) * np.exp(-t / first_s)
            first = first + gain * band(contact, low, high)
        for hz, width_hz, db in KNOCK_MODES:
            mode = np.sin(2 * np.pi * hz * t) * np.exp(-np.pi * width_hz * t)
            body = body + from_db(db) * mode * rng.choice([-1, 1])
        direct = from_db(first_db) * rms_one(first) + from_db(modes_db) * rms_one(body)
        blow = ports(direct, lag_ms) + from_db(tail_db) * rms_one(tail)
        # the level is the rms with all the energy gathered into 12 ms
        add(out, s, from_db(level_db) * rms_one(blow) * np.sqrt(0.012 / t[-1]))
    return out


def background(waver=0.18):
    """Broadband and tonal noise: moving air, and an appliance's faint lines wavering in level and phase."""
    t = np.arange(N) / SR
    hum = 0
    for hz, db in HUM:
        cycles = hz * t + waver * drift(10)
        hum = hum + np.sqrt(2) * from_db(db + drift(10)) * np.sin(2 * np.pi * cycles)
    return from_db(AIR_DB) * colour(diffuse(N), AIR) + hum


def diffuse(size):
    """Diffuse field: white stereo noise from all around, as alike at the ports as LIKENESS says."""
    white = rng.standard_normal((2, next_fast_len(size, True)))
    alike = np.clip(at_hz(LIKENESS, bins(white)), -1, 1)
    mid, side = rfft(white)
    both = np.sqrt(1 + alike) * mid + np.sqrt(1 - alike) * side * [[1], [-1]]
    return irfft(both, white.shape[1])[:, :size]


def ports(x, lag_ms):
    """Arrival-time difference as linear phase: the left port hears x lag_ms after the right."""
    size = next_fast_len(len(x) + 64, True)
    turn = np.pi * np.fft.rfftfreq(size, 1 / SR) * lag_ms / 1000
    return irfft(rfft(x, size) * np.exp(1j * turn * np.array([[-1], [1]])), size)[:, :len(x)]


def resonate(x, hz, width_hz):
    """Damped resonator: a pole pair with gain 1 at the peak."""
    r = np.exp(-np.pi * width_hz / SR)
    poles = [1, -2 * r * np.cos(2 * np.pi * hz / SR), r * r]
    return signal.lfilter(np.array([1, 0, -1]) * (1 - r * r) / 2, poles, x)


def colour(x, spectrum):
    """Spectral shaping by multiplication in frequency; rms 1."""
    size = next_fast_len(x.shape[-1], True)
    gain = from_db(at_hz(spectrum, np.fft.rfftfreq(size, 1 / SR)))
    return rms_one(irfft(rfft(x, size) * gain, size)[..., :x.shape[-1]])


def band(x, low_hz, high_hz, order=2):
    """Causal band-pass filtering."""
    edges_hz = [low_hz, min(high_hz, .45 * SR)]
    return signal.sosfilt(signal.butter(order, edges_hz, "band", fs=SR, output="sos"), x)


def drift(rate):
    """Slow random fluctuation: chance values, rate per second, joined by lines; rms 1."""
    steps = rng.standard_normal(N // 20)
    return rms_one(np.interp(np.arange(N) * rate / SR, np.arange(len(steps)), steps))


def burst(x):
    """Energy scaling: rms 1 if all of x were gathered into five milliseconds."""
    return rms_one(x) * np.sqrt(.005 * SR / x.shape[-1])


def rms_one(x):
    """Power normalisation: scale to rms 1."""
    return x / np.sqrt(np.mean(x ** 2) + 1e-20)


def from_db(db):
    """Logarithmic level: decibels to amplitude gain."""
    return 10 ** (np.asarray(db) / 20)


def at_hz(points, hz):
    """Logarithmic pitch scale: read a table along log frequency."""
    f, value = np.transpose(points)
    return np.interp(np.log(np.maximum(hz, 1)), np.log(f), value)


def bins(x):
    """Discrete spectrum: the frequencies of the transform of x."""
    return np.fft.rfftfreq(x.shape[-1], 1 / SR)


def add(out, s, sound):
    """Superposition: mix a sound in at time s."""
    i = max(round(s * SR), 0)
    out[:, i:i + sound.shape[-1]] += sound[..., :max(N - i, 0)]


def shared_treble(x):
    """Interchannel coherence: the left takes over the right's treble, delayed in its upper part."""
    size = next_fast_len(N + 64, True)
    left, right = rfft(x, size)
    hz = np.fft.rfftfreq(size, 1 / SR)
    share = np.interp(hz, SHARED_FROM_HZ, [0, 1])
    turn = 2 * np.pi * np.maximum(hz - WIDEN_FROM_HZ, 0) * WIDEN_LAG_S
    left = np.sqrt(1 - share) * left + np.sqrt(share) * right * np.exp(-1j * turn)
    return irfft(np.array([left, right]), size)[:, :N]


def scene():
    """Superposition: the packet close by in its room, the rest around it."""
    fine_db, sheet_db = strokes()
    packet = snaps(SNAPS) + snaps(small_snaps(fine_db, sheet_db))
    packet = packet + rubbing(fine_db, sheet_db) + scrapes() + taps()
    around = bumps() + knock() + background()
    return room(in_hand(packet)) + around


def record(dry):
    """Band limitation: the treble is shared, the top rolls off and is then cut steeply."""
    roll_off = signal.butter(18, ROLL_OFF_HZ, fs=SR, output="sos")
    cut = signal.ellip(10, .2, 70, CUTOFF_HZ, fs=SR, output="sos")
    return signal.sosfilt(cut, signal.sosfilt(roll_off, shared_treble(dry)))


dry = scene()
out = record(dry)
file_out(out)
```